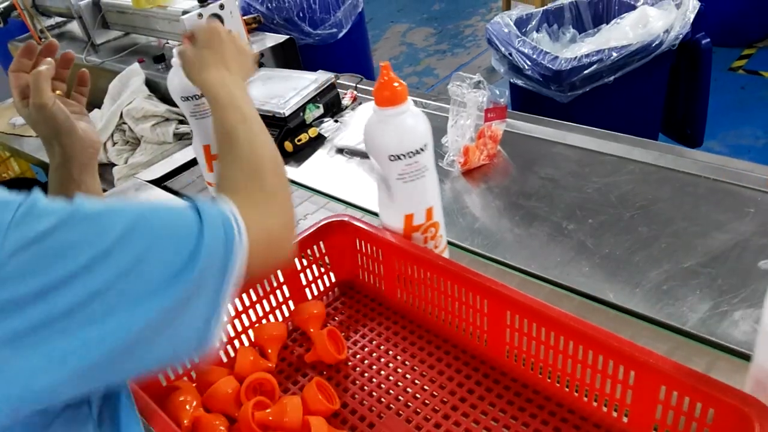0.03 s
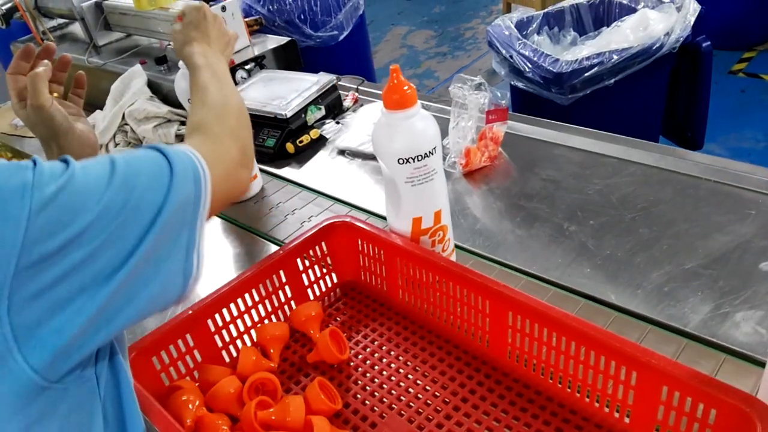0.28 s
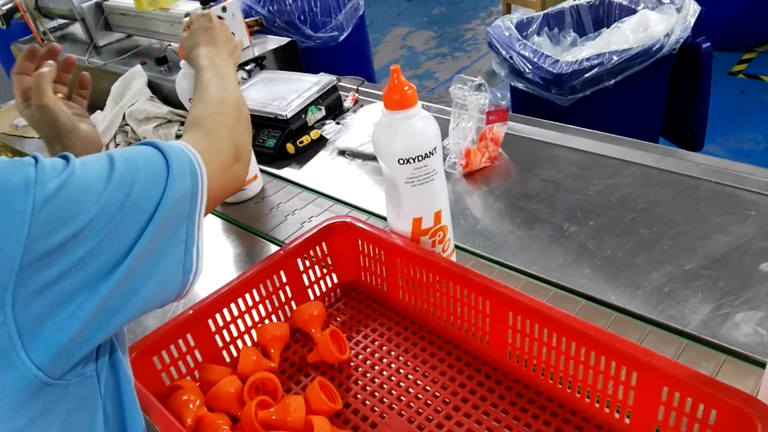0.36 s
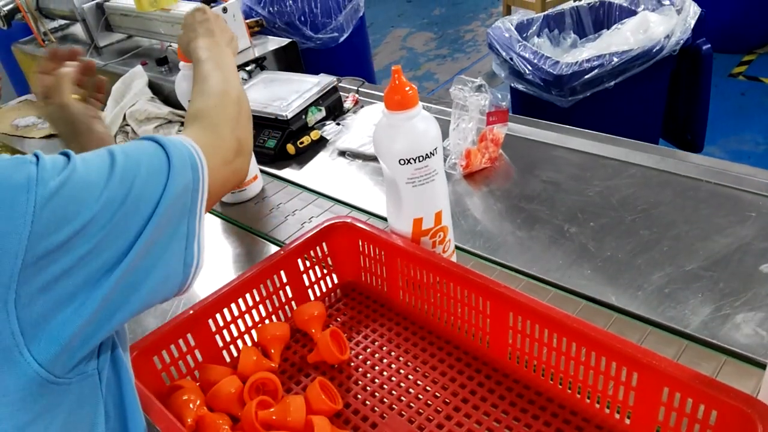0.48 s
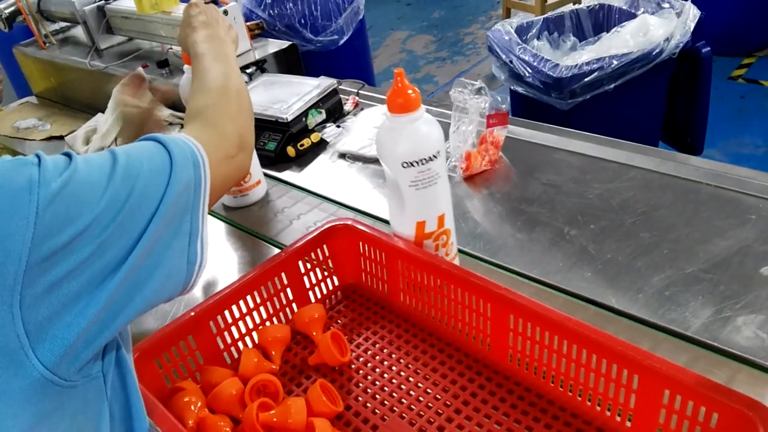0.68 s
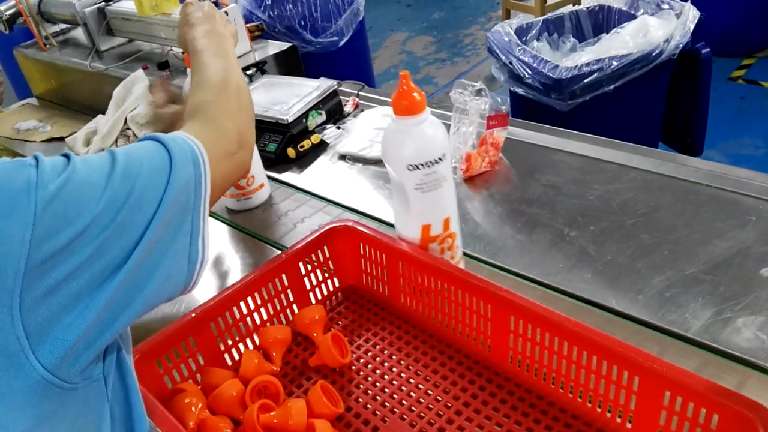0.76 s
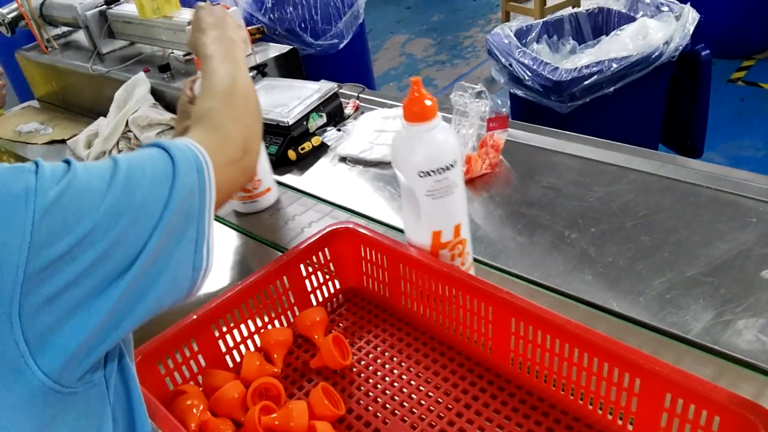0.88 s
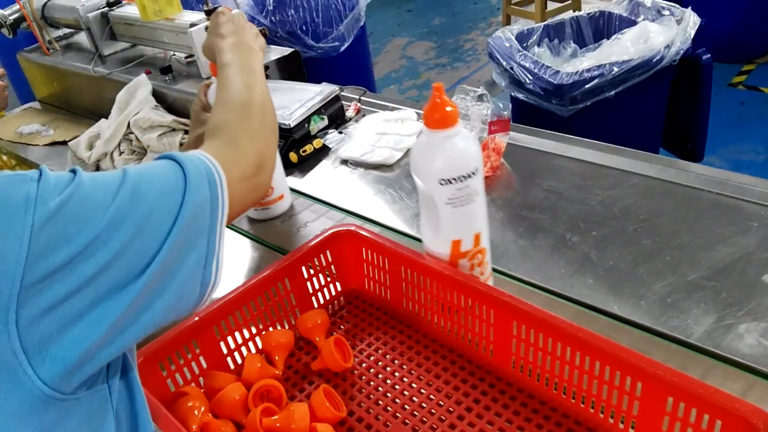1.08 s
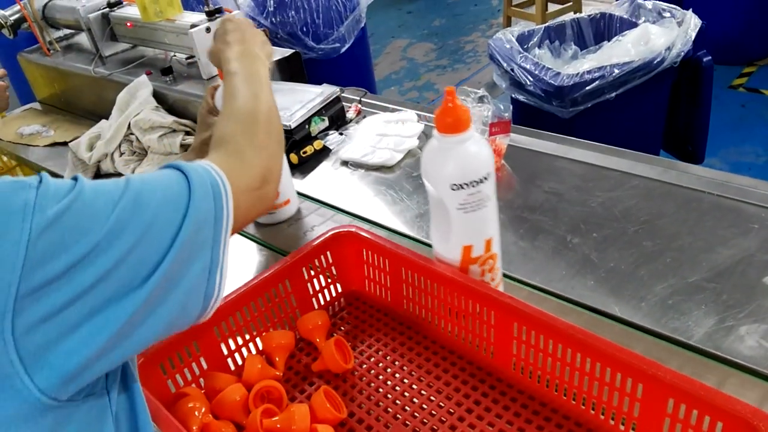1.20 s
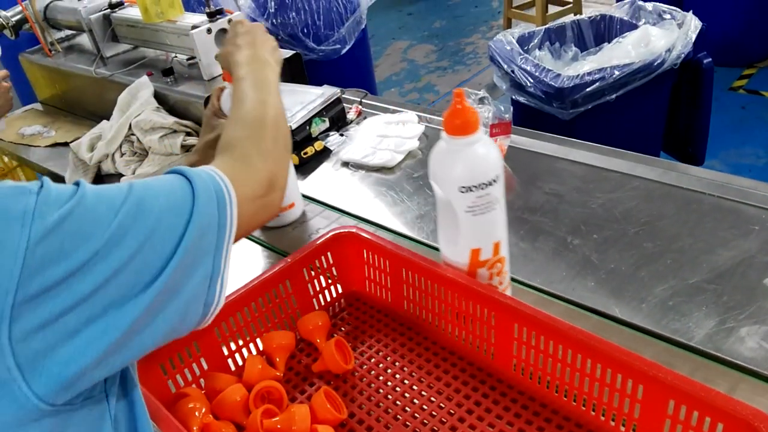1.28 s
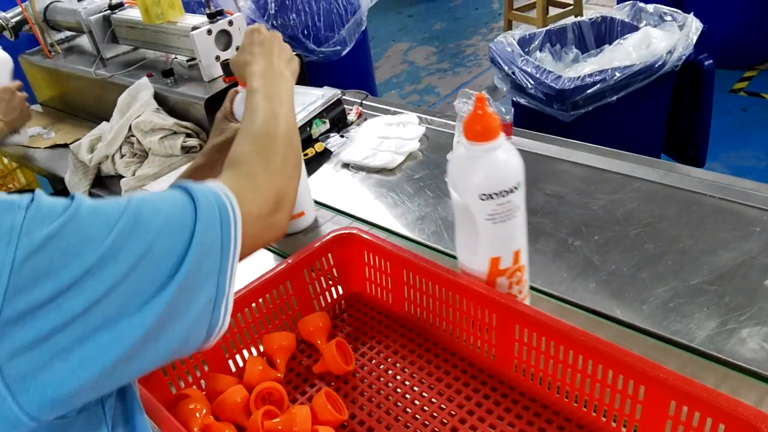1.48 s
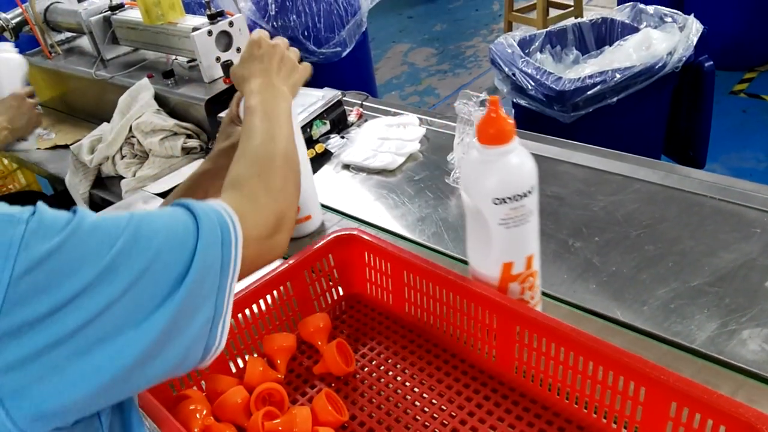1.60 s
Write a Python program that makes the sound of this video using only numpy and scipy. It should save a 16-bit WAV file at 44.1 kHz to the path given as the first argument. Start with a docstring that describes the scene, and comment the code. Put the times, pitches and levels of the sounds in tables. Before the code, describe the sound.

A rattling clack from a bottle capper, then released air, with machinery rumbling behind.

```python
"""A factory hall rumbles and hums. A valve puffs, and a hollow bottle bumps into its seat under a
benchtop pneumatic capper. The feed valve hisses with a faint whistle and the head comes down in a
rattling clack, ringing the frame, the steel chuck and the bench as the plastic cap snaps home.
A far machine drones briefly; half a second after the clack the air is let out."""
import sys
import numpy as np
from scipy import signal
from scipy.fft import rfft, irfft
from scipy.io import wavfile

SR = 44100
rng = np.random.default_rng(int(sys.argv[2]) if len(sys.argv) > 2 else 0)


def unload_wav(signal):
    """Save mono or channel-first audio to the path in sys.argv[1] as 16-bit WAV at rate SR, clipped to [-1, 1]."""
    wavfile.write(
        sys.argv[1],
        SR,
        np.round(np.clip(np.atleast_2d(signal).T, -1, 1) * 32767).astype(np.int16),
    )


N = 72765
T = np.arange(N) / SR
HZ = np.maximum(np.fft.rfftfreq(2 * N, 1 / SR), 1)

# valves letting out air: start_s, level_db, fade_db_per_s, treble_lift_db
VALVE_PUFFS = [(.168, -43, 25, 0.5), (0.604, -41.5, 23, -2), (1.224, -35, 21.5, 3)]
# the head striking and rattling on the frame: start_s, ring_db, crash_db
HEAD_BLOWS = [(.299, -42, -23), (.374, -42, -24.5), (.529, -36, -27.5), (0.7227, -11.5, -18),
              (0.7292, -25, -19.5), (0.7433, -31, -19.5), (0.7628, -21.5, -20.5), (0.7767, -14, -18.5),
              (.789, -24, -21.5), (0.8051, -24.5, -29), (0.8288, -30, -27)]


def from_db(db):
    """Decibels to gain."""
    return 10 ** (np.asarray(db) / 20)


def unit_rms(x):
    """Scale to an rms of 1."""
    return x / np.sqrt(np.mean(x ** 2) + 1e-20)


def at_hz(points, hz):
    """Read a curve on a log-frequency axis."""
    freqs, values = np.transpose(points)
    return np.interp(np.log(hz), np.log(freqs), values)


def colour(x, gain):
    """Filter by a gain per frequency."""
    return irfft(rfft(x, 2 * N) * gain)[..., :N]


def drift(rate_hz):
    """Smooth random wander of rms 1."""
    return unit_rms(colour(rng.standard_normal(N), 1 / (1 + (HZ / rate_hz) ** 2)))


def noise(gain):
    """Coloured stereo noise of rms 1, centred in the bass and wide in the treble."""
    # likeness of left and right: freq_hz, correlation
    likeness = [(100, .98), (350, 0.89), (700, 0.33), (1200, -0.17), (2500, -0.1), (5000, -0.013)]
    alike = np.clip(at_hz(likeness, HZ), -1, 1)
    mid, side = rng.standard_normal((2, N))
    mid = colour(mid, gain * np.sqrt(1 + alike))
    side = colour(side, gain * np.sqrt(1 - alike))
    return unit_rms(mid + side * [[1], [-1]])


def band(hz, half_width_hz):
    """Noise in one resonance."""
    return noise(1 / (1 + ((HZ - hz) / half_width_hz) ** 2))


def attack(start_s, rise_s):
    """Envelope that climbs from 0 towards 1."""
    return 1 - np.exp(-np.maximum(T - start_s, 0) / rise_s)


def decay(start_s, t60_s):
    """Envelope that jumps to 1 and dies away."""
    return (T >= start_s) * 1e-3 ** (np.maximum(T - start_s, 0) / t60_s)


def struck(hits, modes, right_lag_s=0.0003054):
    """Each hit rings a body's modes a little differently; from the left, it reaches the right late."""
    ring = np.zeros(N)
    for start_s, db, *_ in hits:
        force = from_db(db) * attack(start_s, rise_s=0.0016)
        for hz, mode_db, t60_s in modes:
            strength = force * from_db(mode_db + rng.standard_normal())
            ring += strength * decay(start_s, t60_s) * np.sin(2 * np.pi * hz * (T - start_s))
    lowest_hz = modes[0][0]
    ring = signal.sosfilt(signal.butter(2, .6 * lowest_hz, "high", fs=SR, output="sos"), ring)
    return np.array([ring, np.interp(T - right_lag_s, T, ring)])


def factory_rumble(level_db=-31.5, bass_hz=233, flutter_db=0.37):
    """Far machinery: a bed with swelling bass, a slight flutter above it and wavering hums."""
    # tone of the machinery: freq_hz, relative_db
    spectrum = [(25, -33), (50, -12), (100, -4), (160, -3), (240, -6), (360, -3.5), (520, -7), (720, -11),
                (950, -7.5), (1350, -19.5), (2300, -17), (3300, -31), (5000, -36.5), (9500, -42),
                (10700, -51.5), (15500, -52)]
    # rise and fall of the bass: time_s, gain_db
    bass_ride = [(0, -10.5), (.15, 0), (.4, 2.5), (.55, 4.5), (.7, 8), (.9, 5), (1.05, 3.5), (1.35, 1),
                 (1.65, -6)]
    # hums of other machines: pitch_hz, level_db
    hum_tones = [(100, -46), (163, -45), (350, -45.5), (2202, -56)]
    rumble = from_db(level_db) * noise(from_db(at_hz(spectrum, HZ)))
    bass = colour(rumble, 1 / (1 + (HZ / bass_hz) ** 4))
    swell = from_db(np.interp(T, *np.transpose(bass_ride)))
    hums = sum(from_db(db) * np.sqrt(2) * np.sin(2 * np.pi * hz * T + drift(rate_hz=1.7))
               for hz, db in hum_tones)
    flutter = from_db(flutter_db * drift(rate_hz=26))
    return bass * swell + (rumble - bass) * flutter + hums


def thin_whine(level_db=-64):
    """A steady, narrow hiss hangs high in the hall."""
    return from_db(level_db) * band(9840, half_width_hz=220)


def air_puffs(treble_hz=7650, dulling_db_per_s=9):
    """Each valve opens quickly, treble first; its hiss fades and dulls as the pressure drops."""
    # tone of the escaping air: freq_hz, relative_db
    spectrum = [(500, -33), (1100, -4), (2200, 5.5), (3200, 6), (4500, 3.5), (6500, -1), (9500, -11.5),
                (13000, -13.5), (15500, -18.5)]
    puffs = 0
    for start_s, db, fade_db_per_s, lift_db in VALVE_PUFFS:
        age = np.maximum(T - start_s, 0)
        hiss = noise(from_db(at_hz(spectrum, HZ)))
        treble = colour(hiss, 1 / (1 + (treble_hz / HZ) ** 4))
        jet = treble * attack(start_s, rise_s=0.0087) * from_db(lift_db - dulling_db_per_s * age)
        body = (hiss - treble) * attack(start_s, rise_s=.035)
        puffs += from_db(db - fade_db_per_s * age) * (jet + body)
    return puffs


def bottle_bumps():
    """The hollow bottle knocks into its seat with a short, low ring."""
    # knocks against the seat: start_s, level_db
    bumps = [(.2435, -19), (.2565, -17), (.2627, -19), (.3155, -19.5)]
    # bottle modes: pitch_hz, level_db, t60_s
    modes = [(325, 5, 0.074), (398, 7.5, 0.025), (503, -31, 0.026)]
    return struck(bumps, modes)


def cap_ticks(half_width_at_1khz=450):
    """The plastic cap ticks on the neck and snaps home, each tick a burst in one broad resonance."""
    # snaps of plastic: start_s, level_db, centre_hz
    snaps = [(.2655, -36, 12000), (.2988, -29, 2800), (.446, -33, 5000), (.449, -45, 12000),
             (.4535, -23, 1700), (.6195, -40, 11500), (.677, -37, 13000), (.7232, -14, 2800),
             (.731, -16, 1600), (.786, -31, 12500), (1.31, -20, 1700)]
    ticks = 0
    for start_s, db, hz in snaps:
        envelope = attack(start_s, rise_s=0.00096) * decay(start_s, t60_s=.018)
        ticks += from_db(db) * envelope * band(hz, half_width_at_1khz * np.sqrt(hz / 1000))
    return ticks


def frame_ring():
    """The head's blows set the capper's frame ringing."""
    # frame modes: pitch_hz, level_db, t60_s
    modes = [(325.8, -2.5, 0.24), (370, 5.5, 0.048), (480.6, -1.5, 0.1), (540, -5.5, .14),
             (606.4, -24, 0.75), (838.6, -11, 0.25), (910, -13.5, 0.21), (1019, -18.5, 0.19),
             (1575, -1, 0.045), (1863, -25, 0.34), (2090, -11.5, 0.16), (2372, -24.5, 0.52),
             (2910, -36, .03)]
    return struck(HEAD_BLOWS, modes)


def head_crash(hard_blow_db=-19, dull_above_hz=4000):
    """Every blow excites the same dense, short-lived modes; weak blows are duller."""
    # tone of the dense modes: freq_hz, relative_db
    spectrum = [(150, -10), (450, 9.5), (720, -1.5), (1000, 4), (1300, -2), (1700, 0), (2500, -4.5),
                (3600, -9), (5000, -18), (7500, -22), (9500, -31), (15000, -32.5)]
    bright = noise(from_db(at_hz(spectrum, HZ))) * attack(0, rise_s=0.00051) * decay(0, t60_s=0.098)
    dull = colour(bright, 1 / (1 + (HZ / dull_above_hz) ** 2))
    clatter = np.zeros((2, N))
    for start_s, _, db in HEAD_BLOWS:
        hardness = min(from_db(db - hard_blow_db), 1)
        blow = hardness * bright + (1 - hardness) * dull
        start = int(start_s * SR)
        clatter[:, start:] += from_db(db) * blow[:, :N - start]
    return clatter


def chuck_clinks(pan_db=3.5):
    """The steel chuck clinks brightly, louder on the right."""
    # taps on the chuck: start_s, level_db
    clinks = [(.351, -34.5), (.528, -40.5), (.7435, -24.5), (.7565, -25.5), (.777, -29), (.805, -27)]
    # steel modes: pitch_hz, level_db, t60_s
    modes = [(3253, -13, 0.58), (4055, -1.5, 0.096), (4101, -1.5, 0.09), (4170, -22, .04), (5070, -6, 0.06),
             (6090, -20.5, 0.087), (6580, -31, 0.23), (6950, -15.5, 0.11), (7500, -19, 0.25),
             (7730, -18, 0.21)]
    return struck(clinks, modes) * from_db([[-pan_db], [pan_db]])


def valve_whistle(level_db=-53.5):
    """The valve that feeds the downstroke sings as it opens."""
    opens_s = VALVE_PUFFS[1][0]
    return from_db(level_db) * decay(opens_s, t60_s=0.7) * band(8970, half_width_hz=340)


def bench_thuds():
    """The bench takes the load and answers with deep thuds."""
    # jolts to the bench: start_s, level_db
    thuds = [(.748, -18.5), (.7605, -18), (.7675, -20.5), (.823, -19.5), (1.304, -24.5)]
    # bench modes: pitch_hz, level_db, t60_s
    modes = [(106.3, -16.5, 0.73), (151.3, 4, 0.11), (173.5, -7.5, 0.51)]
    return struck(thuds, modes)


def far_drone(peak_s=1.029, spread_s=0.099, pitch_hz=496.5, level_db=-35):
    """A far machine's wavering tone swells and fades."""
    swell = np.exp(-((T - peak_s) / spread_s) ** 2)
    tone = np.sqrt(2) * np.sin(2 * np.pi * pitch_hz * T + drift(rate_hz=14))
    return from_db(level_db) * swell * tone


def hall_reverb(send):
    """Diffuse reverberation whose treble dies first."""
    # ring time of the hall: freq_hz, t60_s
    ring_times = [(150, .7), (1000, 0.73), (3000, 0.56), (8000, 0.43), (15000, .3)]
    white = rng.standard_normal((2, N))
    edges_hz = np.geomspace(40, 20000, 10)
    tail = 0
    for low, high in zip(edges_hz, edges_hz[1:]):
        envelope = attack(0, rise_s=0.0049) * decay(0, at_hz(ring_times, np.sqrt(low * high)))
        tail += colour(white, (HZ >= low) & (HZ < high)) * envelope / np.sqrt(np.sum(envelope ** 2))
    return signal.fftconvolve(send, tail, axes=1)[:, :N]


def scene():
    """The impacts feed the hall's reverb; the air and the factory bed are mixed in dry."""
    # sound, reverb_send_db
    impacts = [(bottle_bumps(), -18.5), (cap_ticks(), -14.5), (frame_ring(), -8),
               (head_crash(), -1), (chuck_clinks(), -7.5), (bench_thuds(), -18.5)]
    direct = sum(sound for sound, _ in impacts)
    reverb = hall_reverb(sum(from_db(send_db) * sound for sound, send_db in impacts))
    bed = factory_rumble() + thin_whine() + far_drone()
    return bed + direct + reverb + air_puffs() + valve_whistle()


def record(dry, low_cut_hz=22, high_cut_hz=15500):
    """The two microphone ports differ in colour; the deep bass and the very top are cut."""
    # balance of the ports: freq_hz, left_minus_right_db
    balance = [(300, -0.5), (700, -2), (1300, 2.5), (2300, 2), (4000, -1), (7000, 2), (10500, 8),
               (15000, 5.5)]
    port_gain = from_db(at_hz(balance, HZ) * np.array([[.5], [-.5]]))
    heard = colour(dry, port_gain / np.sqrt(1 + (low_cut_hz / HZ) ** 8))
    return signal.sosfilt(signal.ellip(12, .1, 90, high_cut_hz, fs=SR, output="sos"), heard)


dry = scene()
out = record(dry)
unload_wav(out)
```